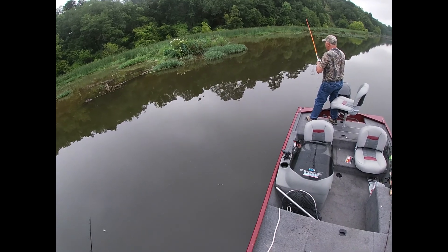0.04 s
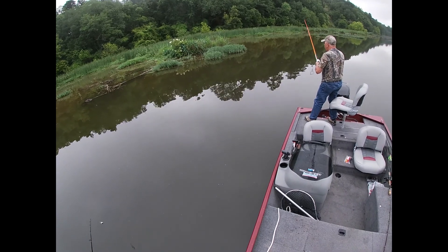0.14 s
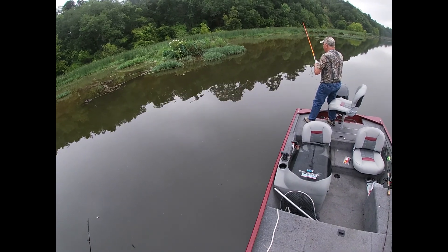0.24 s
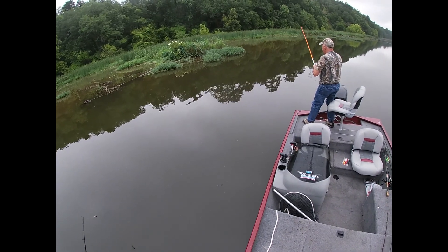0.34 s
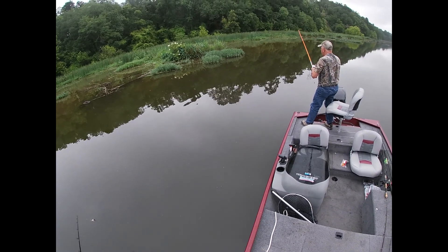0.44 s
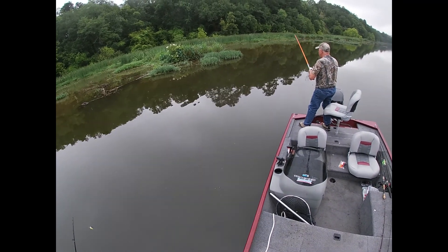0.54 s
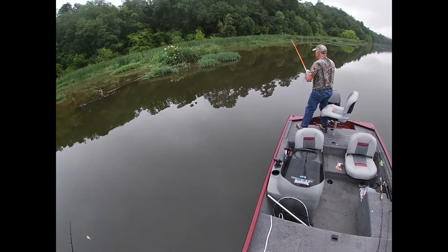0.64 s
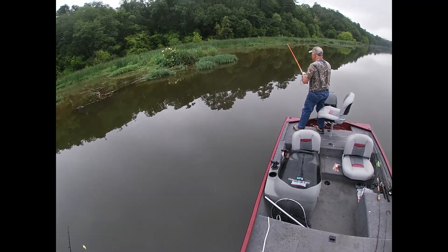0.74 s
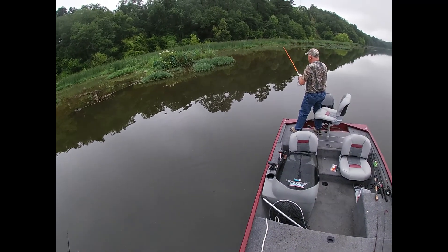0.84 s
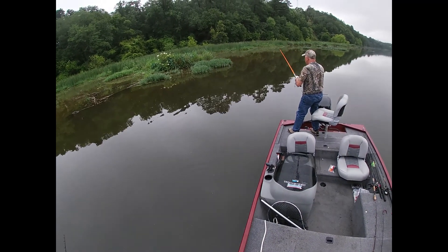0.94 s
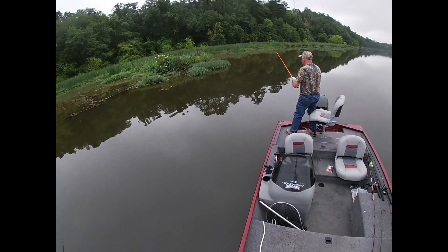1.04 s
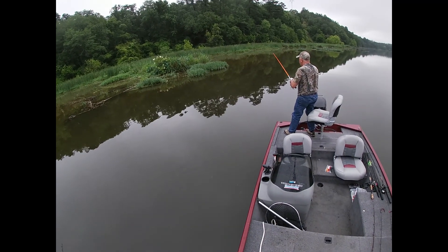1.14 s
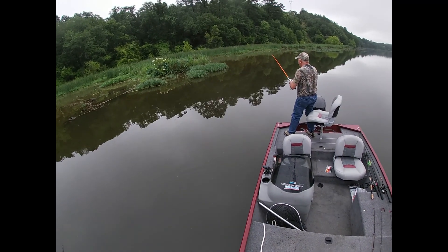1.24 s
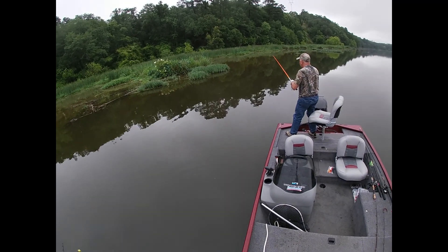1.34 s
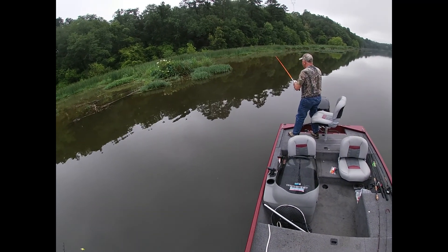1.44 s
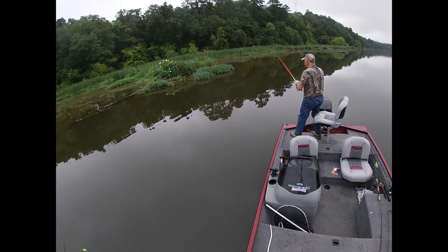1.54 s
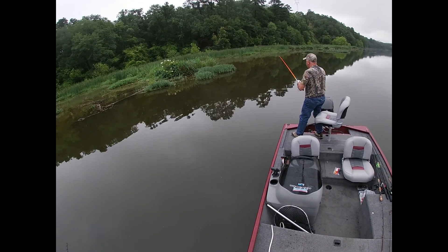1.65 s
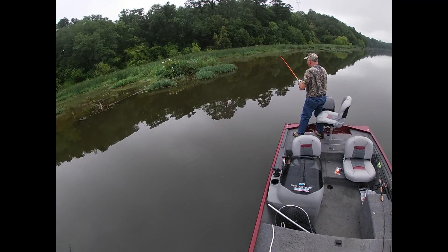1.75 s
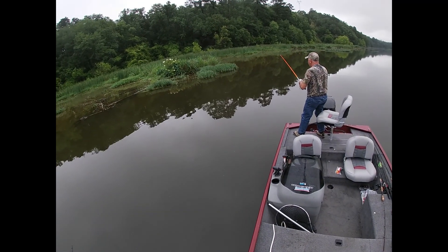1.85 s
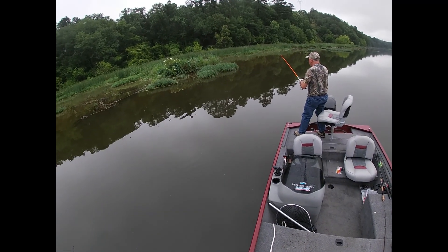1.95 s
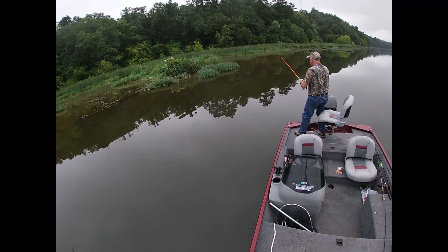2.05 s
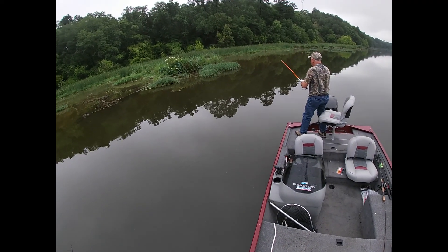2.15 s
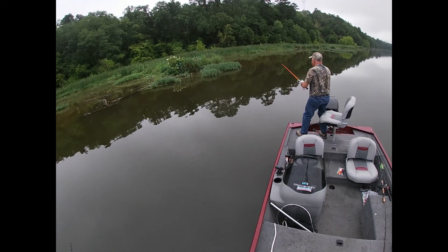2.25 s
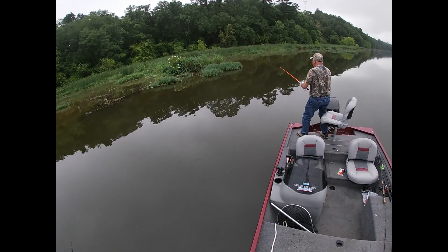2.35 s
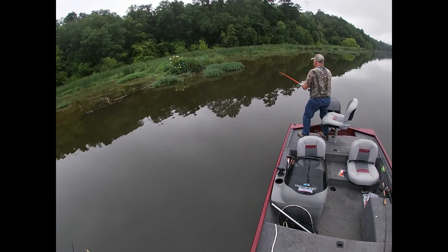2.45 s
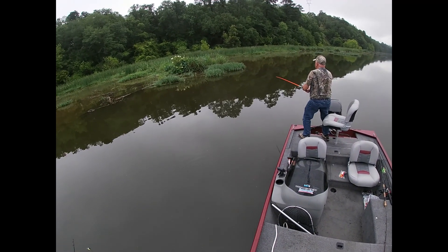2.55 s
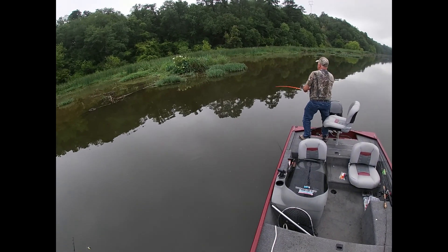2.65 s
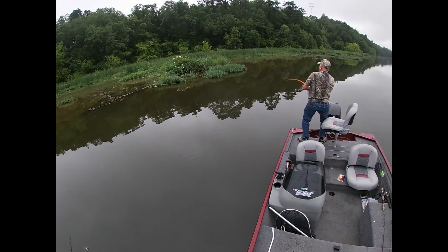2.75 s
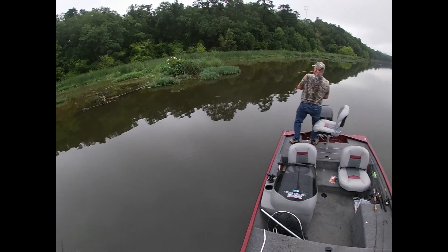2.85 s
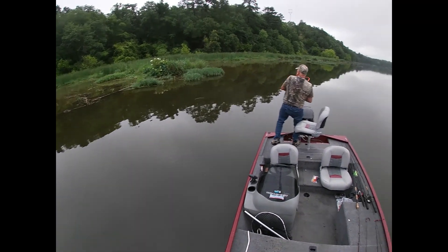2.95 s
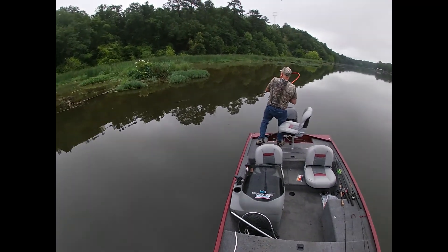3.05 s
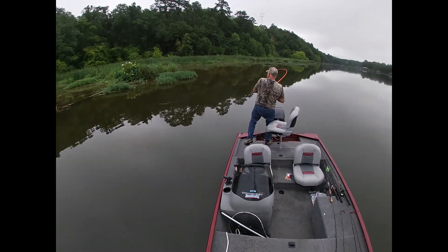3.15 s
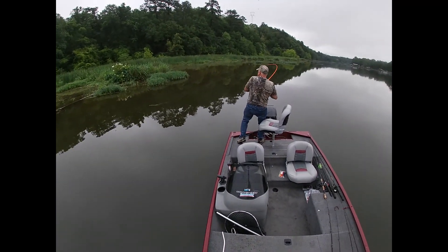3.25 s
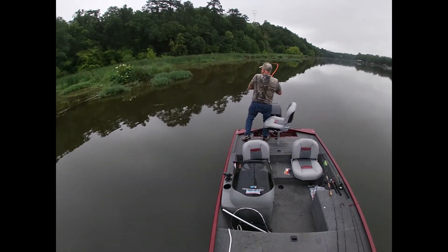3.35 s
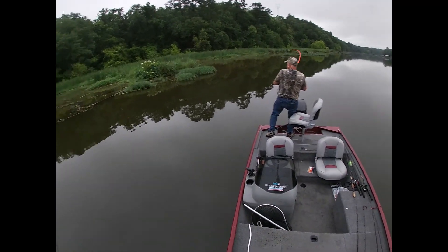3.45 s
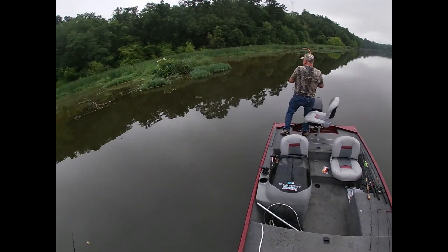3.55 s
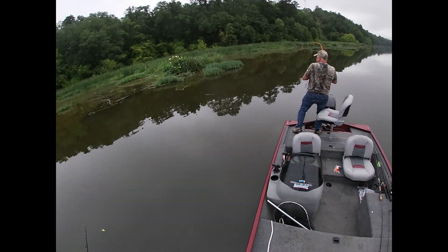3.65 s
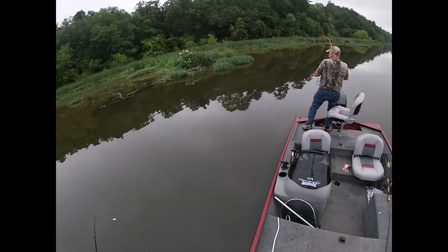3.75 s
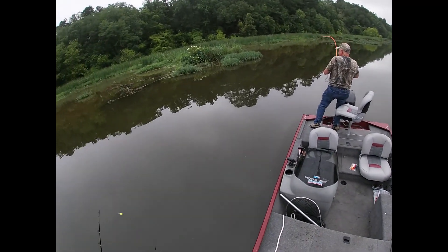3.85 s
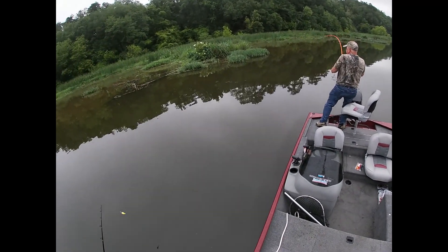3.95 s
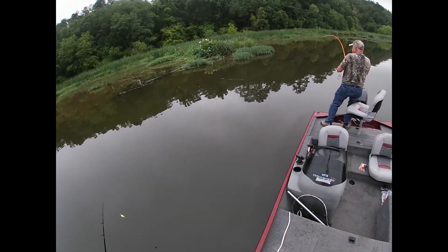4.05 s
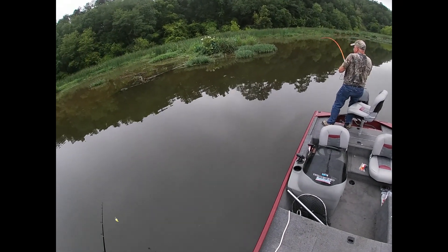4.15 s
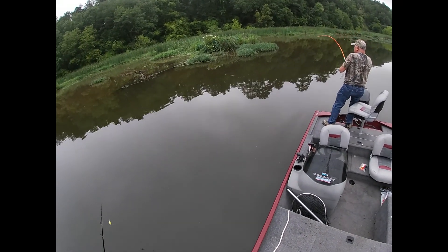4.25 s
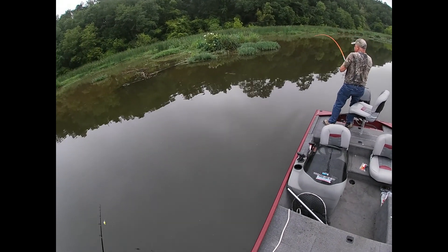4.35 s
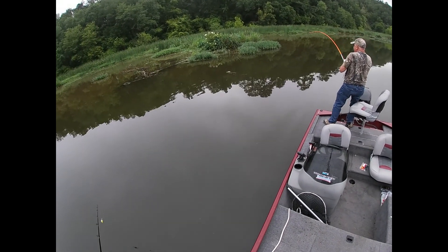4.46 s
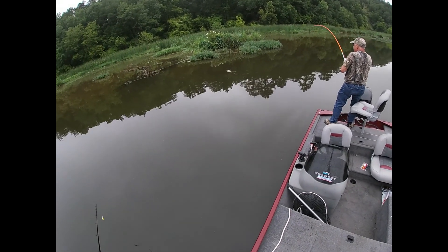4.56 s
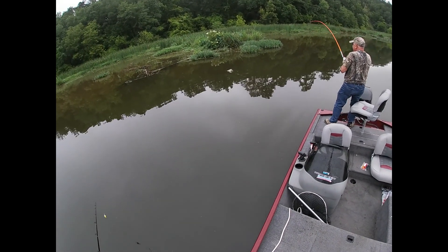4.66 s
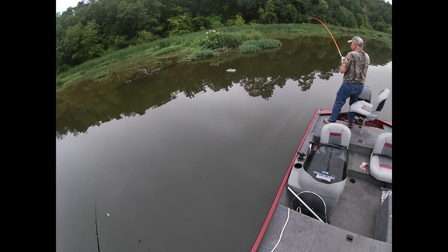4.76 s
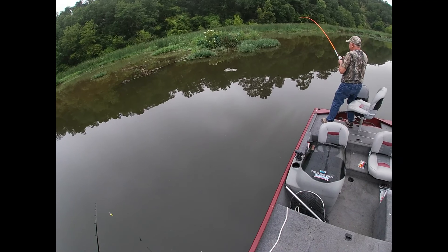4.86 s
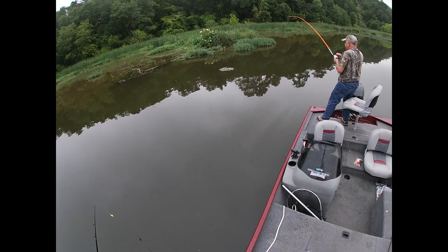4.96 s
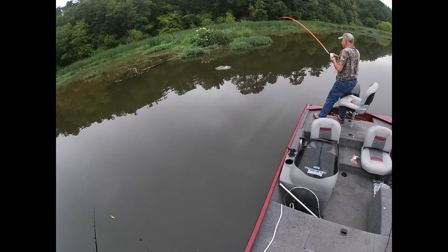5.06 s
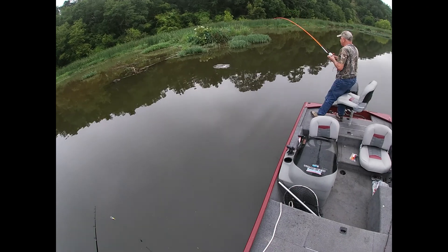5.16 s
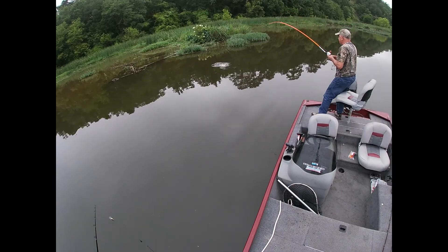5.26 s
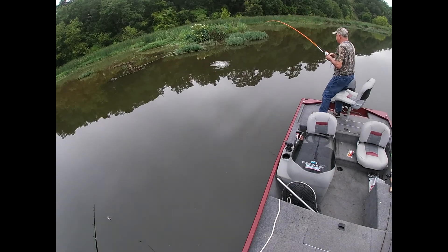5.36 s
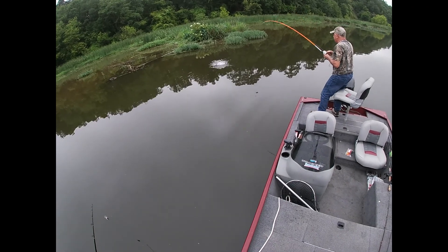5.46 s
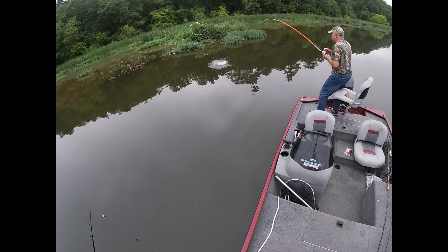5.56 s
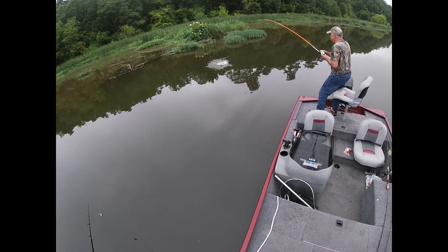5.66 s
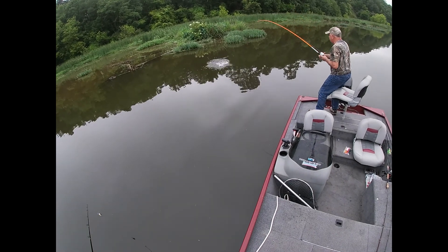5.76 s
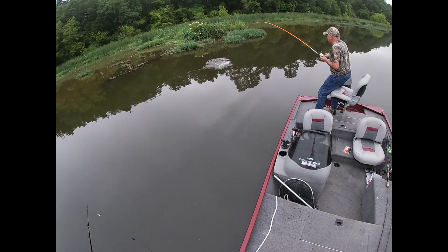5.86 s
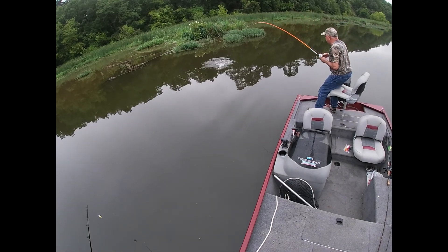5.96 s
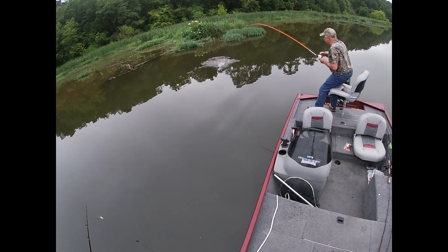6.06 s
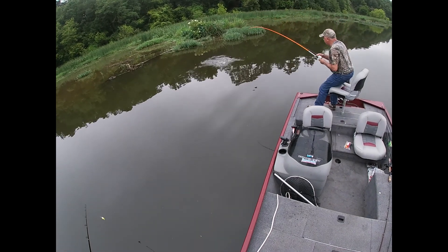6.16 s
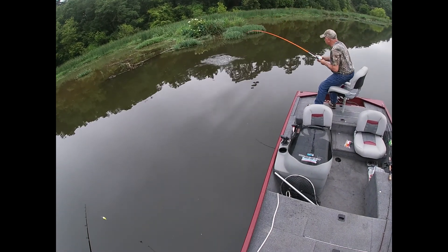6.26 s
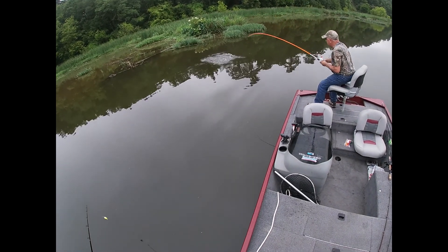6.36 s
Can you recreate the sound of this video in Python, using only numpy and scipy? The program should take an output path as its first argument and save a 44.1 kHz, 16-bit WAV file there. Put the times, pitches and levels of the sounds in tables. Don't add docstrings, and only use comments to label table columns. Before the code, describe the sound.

Steady insect buzz and light birdsong over still water, soft rustling, a double metallic click, then bubbly slaps and spray from a thrashing fish.

```python
import sys
import numpy as np
from scipy import signal
from scipy.fft import rfft, irfft, next_fast_len
from scipy.io import wavfile
from scipy.ndimage import map_coordinates

SR = 44100
rng = np.random.default_rng(int(sys.argv[2]) if len(sys.argv) > 2 else 0)


def invert_db(level):
    return 10 ** (np.asarray(level, dtype=float) / 20)


def master(y):
    cut = np.clip(np.atleast_2d(y).T, -1, 1)
    pcm = np.round(cut * 32767)
    wavfile.write(sys.argv[1], SR, pcm.astype(np.int16))


N = 283122

# start in seconds, peak level in dB, start pitch in Hz, end pitch in Hz, t60 in seconds.
PLUNGES = [(4.878, -49, 408, 537, 0.15), (5.077, -31.5, 517, 287, 0.019), (5.09, -52, 182, 230, 0.09),
           (5.394, -36.5, 785, 457, 0.018), (5.411, -40.5, 292, 340, 0.076),
           (5.465, -34.5, 400, 393, 0.056), (5.511, -29.5, 700, 610, 0.01), (5.516, -34, 280, 354, 0.11),
           (6.029, -32.5, 156, 406, 0.1), (6.101, -34.5, 205, 520, 0.084), (6.235, -39, 400, 570, 0.052),
           (6.333, -48.5, 567, 733, 0.078), (5.799, -56, 200, 210, .12), (4.971, -43.5, 206, 220, 0.055),
           (6.061, -36.5, 189, 200, 0.042), (6.336, -36.5, 203, 218, 0.035)]
# time in seconds, level in dB.
THRASH = [(4.722, -80), (4.737, -58), (4.97, -54.5), (5.06, -58.5), (5.45, -51), (5.63, -49), (5.65, -51),
          (5.85, -46), (5.92, -48), (5.94, -49.5), (6.125, -50.5), (6.17, -56), (6.42, -64)]
# start in seconds, peak level in dB, upper band edge in Hz.
SLAPS = [
    (5.01, -39, 2630),
    (5.079, -28, 1100),
    (5.168, -38, 1700),
    (5.394, -32.5, 2550),
    (5.5126, -29.5, 3400),
    (5.804, -36, 2600),
    (6.06, -34.5, 6960),
    (6.131, -45, 7900),
    (6.3335, -33, 2580),
]


def fish():
    out = pockets() + drops() + slaps() + spray()
    return out + invert_db(-13.5) * echoes(out)


def pockets():
    # start in seconds, peak level in dB, pitch in Hz.
    middling = [(4.75, -48.5, 690), (4.79, -43, 1220), (5.033, -49.5, 840), (5.167, -37.5, 742),
                (5.193, -36, 873), (5.235, -49, 726), (5.605, -42.5, 684), (5.663, -43, 683),
                (5.793, -44.5, 736), (5.942, -38.5, 760), (6.002, -44, 492), (6.078, -36.5, 1150),
                (6.1, -38, 840), (6.158, -48, 793), (6.187, -44, 744)]
    out = np.zeros(N)
    for s, db, hz, end_hz, t60 in PLUNGES:
        add(out, s, invert_db(db) * bubble(hz, end_hz, t60))
    for s, db, hz in middling:
        add(out, s, invert_db(db) * bubble(hz, 1.098 * hz, 21.3 / hz))
    return out


def drops():
    # start in seconds, peak level in dB, pitch in Hz.
    clear = [(4.753, -47, 1760), (4.8394, -36, 1764), (4.873, -42, 1274), (4.973, -39.5, 3160),
             (5.006, -47, 1420), (5.076, -58, 1410), (5.09, -40, 1510), (5.1673, -42, 1454),
             (5.301, -38, 1266), (5.326, -40.5, 2900), (5.3799, -35, 1174), (5.467, -41, 1420),
             (5.5153, -39, 1330), (5.593, -38, 1366), (5.686, -48, 1595), (5.739, -52, 2310),
             (5.806, -37, 2540), (5.8998, -40, 3230), (5.954, -36.5, 1284), (6.011, -36.5, 1344),
             (6.0378, -41, 1210), (6.09, -37, 2320), (6.247, -45, 3240), (6.271, -46, 3260),
             (6.356, -51, 713)]
    # start in seconds, peak level in dB, pitch in Hz.
    ticks = [(4.889, -44, 2930), (4.9545, -43, 3200), (5.0244, -39, 4990), (5.0394, -47, 3360),
             (5.0555, -55, 3220), (5.086, -35, 4710), (5.0997, -40, 2860), (5.1224, -37, 3920),
             (5.1463, -42, 3060), (5.1717, -38, 3770), (5.187, -42, 3040), (5.265, -42, 2340),
             (5.3417, -35, 3800), (5.3738, -45, 2120), (5.4666, -48, 2320), (5.512, -31.5, 3020),
             (5.5264, -39, 2340), (5.545, -44, 2290), (5.612, -35, 3070), (5.6274, -34, 3180),
             (5.6866, -34.5, 2170), (5.7944, -34, 3100), (5.8547, -40, 2380), (5.8794, -39, 3130),
             (5.955, -35.5, 2290), (5.9803, -38, 3010), (6.0473, -39, 2450), (6.0602, -35.5, 2260),
             (6.1324, -34.5, 3180), (6.2229, -44, 1830), (6.2947, -47, 2230), (6.3534, -43, 3250)]
    # start in seconds, peak level in dB, pitch in Hz.
    blobs = [(4.813, -41, 1800), (4.9463, -44, 1620), (5.024, -47, 1420), (5.153, -46, 1540),
             (5.2883, -42, 1290), (5.3701, -40, 1116), (5.499, -35, 1380), (5.5402, -39, 1480),
             (5.5813, -44, 1470), (5.6194, -44, 1080), (5.6946, -37.5, 1570), (5.852, -41, 1550),
             (5.9743, -34, 1270), (6.074, -44, 1200), (6.096, -40, 1600), (6.3331, -42, 1630)]
    # start in seconds, peak level in dB.
    spits = [(4.8869, -53), (4.9293, -54), (4.9647, -55), (5.1229, -61), (5.1388, -57), (5.1912, -64),
             (5.266, -56), (5.2845, -54), (5.3293, -53), (5.3658, -49), (5.4082, -55), (5.4621, -59),
             (5.5065, -55), (5.6437, -54), (5.703, -51), (5.7538, -51), (5.7798, -49), (5.788, -47),
             (5.8332, -57), (5.905, -48), (5.944, -61), (6.1201, -61), (6.1326, -57)]
    out = np.zeros(N)
    for s, db, hz in clear:
        add(out, s, invert_db(db - 2) * bubble(hz, 0.944 * hz, 34 / hz))
        impact = invert_db(db - 23 - 60 * np.arange(400) / SR / 0.0095) * rng.standard_normal(400)
        add(out, s, impact)
    for s, db, hz in [*ticks, *blobs]:
        add(out, s, invert_db(db - 2) * bubble(hz, 1.06 * hz, 17 / hz))
    bursts = surges([(s, 0, db + 4) for s, db in spits], rise_s=.0005, fade_s=.012 / np.log(1000))
    return out + bursts * noise(peak(7840, 6700))


def slaps():
    out = np.zeros(N)
    for s, db, bright_hz in SLAPS:
        burst = invert_db(db - 60 * np.arange(900) / SR / 0.016) * rng.standard_normal(900)
        burst[:4] += invert_db(db + 3)
        band = signal.butter(2, [260, bright_hz], "band", fs=SR)
        add(out, s, signal.lfilter(*band, burst))
    return out


def spray():
    # frequency in Hz, density in dB per Hz.
    spray_colour = [(530, -69), (900, 2), (1570, 10.5), (2020, -17), (3070, 0), (4400, 2), (5720, -45),
                    (9680, -120)]
    # frequency in Hz, density in dB per Hz.
    fizz_colour = [(3000, -0.5), (4500, -8), (6500, -3), (8000, -11), (10000, -6.5), (12500, -6),
                   (16000, -5.5)]
    # start in seconds, level in dB.
    showers = [(4.92, -69), (5.29, -77), (5.38, -77), (5.6, -76), (5.66, -79), (5.78, -73), (5.9, -77),
               (5.51, -74), (5.98, -90), (6.08, -90), (6.13, -98), (6.25, -77)]
    # start in seconds, length in seconds, level in dB.
    churns = [
        (4.87, 0.04, -75),
        (5.37, 0.19, -48.5),
        (6, 0.15, -55.5),
        (6.33, 0.023, -58.5),
    ]

    effort_db, = curves(THRASH)
    by_slaps = surges([(s, 0, db - 15.5) for s, db, _ in SLAPS], rise_s=0.0089, fade_s=0.0086)
    thrown = invert_db(effort_db) + by_slaps
    over_plunges = surges([(s, 0, db - 29) for s, db, *_ in PLUNGES], rise_s=0.0035, fade_s=0.016)
    closing = invert_db(effort_db - 5.5) + surges(churns, rise_s=0.0033, fade_s=0.028) + over_plunges
    fine = invert_db(-80.5 + 0.6 * (effort_db + 54.5)) * (effort_db > -99)
    landing = surges([(s, 0, db) for s, db in showers], rise_s=0.0045, fade_s=0.018)
    clumps_db = 1.8 * np.clip(wobble(55), -3, 1.3)

    wash = noise(lambda f: invert_db(along(spray_colour, f)))
    coarse = .44 * wash + .86 * grains(700, hz=1900, spread=.45, cycles=2.6, scatter_db=5)
    slosh = .62 * noise(peak(520, 800))
    slosh += 0.4 * grains(300, hz=685, spread=.35, cycles=3.04, scatter_db=4.0)
    crackle = 0.58 * rng.standard_normal(N)
    crackle += 0.82 * grains(1700, hz=5170, spread=0.41, cycles=1.53, scatter_db=5.0)
    fizz = 0.91 * unit(filtered(crackle, lambda f: invert_db(along(fizz_colour, f))))

    out = thrown * invert_db(clumps_db - 1.5) * coarse + closing * invert_db(3.8 * wobble(30)) * slosh
    droplets = fine * fizz + invert_db(2) * landing * filtered(fizz, peak(8600, 9000))
    return out + invert_db(22.5 + 1.3 * clumps_db) * droplets


def bubble(hz, end_hz, t60):
    t = np.arange(int(t60 * SR)) / SR
    pitch = hz + (end_hz - hz) * np.minimum(t / (.5 * t60), 1)
    decay = invert_db(-60 * (t / t60) ** 1.95)
    onset = 1 - np.exp(-t * hz / 0.95)
    return np.sin(2 * np.pi * np.cumsum(pitch) / SR) * decay * onset


def grains(per_s, hz, spread, cycles, scatter_db):
    start, count = THRASH[0][0], int(per_s * 2)
    when, pitch = rng.random(count), rng.standard_normal(count)
    size = np.minimum(rng.exponential(size=count), 2.6)
    f = np.clip(hz * np.exp(spread * pitch), 150, 14000)[:, None]
    t = np.arange(640) / SR
    age = t * f / cycles
    envelope = invert_db(scatter_db * size)[:, None] * np.exp(-age) * (1 - np.exp(-8 * age))
    rows = envelope * np.sin(2 * np.pi * f * t * (1 + 0.0796 * age))
    at = ((start + 2 * when) * SR).astype(int)[:, None] + np.arange(len(t))
    out = np.bincount(at.ravel(), rows.ravel(), N)[:N]
    return out / np.std(out[round(start * SR):])


def echoes(x):
    # frequency in Hz, t60 in seconds.
    bank_decay = [(300, 0.65), (3000, 0.79), (9000, 0.24)]
    hz, t, z = signal.stft(rng.standard_normal(SR // 2), SR, nperseg=256)
    fading = z * invert_db(-60 * t / along(bank_decay, hz)[:, None])
    tail = signal.istft(fading, SR, nperseg=256)[1]
    return signal.fftconvolve(x, tail / np.linalg.norm(tail))[:N]


def angler():
    # start in seconds, length in seconds, cloth in dB, line hiss in dB, deck in dB.
    moves = [
        (0.245, 0.036, -76, -99, -86),
        (0.629, 0.23, -71, -91, -61),
        (0.966, 0.24, -70, -84, -66),
        (1.775, 0.053, -75, -93, -65.5),
        (2.306, .12, -81, -92, -81),
        (2.602, 0.2, -77, -90, -62),
        (2.928, 0.13, -69, -99, -62),
        (3.193, 0.29, -70.5, -100, -70.5),
        (3.92, 0.45, -91, -83, -79),
        (4.122, 0.026, -80, -100, -68),
    ]
    # centre in Hz, width in Hz.
    sweep = (150, 2700)
    # start in seconds, length in seconds, level in dB.
    swish = (2.94, 0.079, -60.5)
    levels = []
    for k in range(3):
        levels.append(surges([(s, hold, dbs[k]) for s, hold, *dbs in moves], rise_s=.09, fade_s=.05))
    cloth, line, deck = levels
    grit_db = 1.3 * wobble(60) + 1.3 * wobble(9)
    out = (cloth + invert_db(-100.0)) * invert_db(grit_db) * noise(lambda f: peak(1450, 800)(f) ** 2)
    out += (line + invert_db(-89.0)) * invert_db(6 + grit_db) * noise(lambda f: peak(7500, 3500)(f) ** 2)
    out += (deck + invert_db(-86.5)) * invert_db(-3.0 + 1.8 * wobble(50)) * noise(peak(*sweep))
    out += surges([swish], rise_s=0.062, fade_s=.02) * noise(lambda f: peak(1280, 350)(f) ** 2)
    return out + reel()


def reel():
    # start in seconds, peak level in dB, knock relative to it in dB, t60 in seconds.
    snaps = [
        (2.773, -49.5, 5, .015),
        (2.8003, -27, -14.5, 0.03),
        (2.9999, -49, 5, 0.008),
        (3.0196, -21, -12.5, 0.027),
        (3.061, -43.5, -1.5, 0.013),
    ]
    # start in seconds, peak level in dB, pitch in Hz, t60 in seconds.
    rings = [(2.8008, -38.5, 1820, 0.02), (2.809, -45, 190, 0.063), (2.826, -53, 500, 0.047),
             (3.1, -54, 810, 0.019), (3.0003, -48.5, 410, .04), (3.0196, -37.5, 2220, .02),
             (3.0205, -39, 3640, .03), (3.022, -37, 4440, .025), (3.023, -44, 2990, .04),
             (3.027, -45, 390, 0.1), (3.024, -46, 211, 0.087), (4.19, -56, 400, 0.072),
             (3.0, -42, 2800, 0.0057), (3.075, -53, 155, 0.13)]
    out, cracks, knocks = np.zeros(N), np.zeros(N), np.zeros(N)
    t = np.arange(SR // 8) / SR
    for s, db, knock_db, t60 in snaps:
        rattle = rng.standard_normal((2, len(t)))
        crack = invert_db(db - 60 * (t / t60) ** 1.1) + invert_db(db - 29.0 - 60 * t / 0.53)
        knock = invert_db(db + knock_db - 60 * t / 0.11) * (1 - np.exp(-t / 0.0089))
        add(cracks, s, rattle[0] * crack)
        add(knocks, s, rattle[1] * knock)
        add(knocks, s + 0.00204, invert_db([db + knock_db + 11.5]))
    for s, db, hz, t60 in rings:
        add(out, s, invert_db(db) * bubble(hz, hz, t60))
    bright = filtered(cracks, lambda f: peak(4900, 4200)(f) + 0.5 * peak(1800, 200)(f))
    thud = filtered(knocks, lambda f: peak(420, 350)(f) + 0.9 * peak(195, 60)(f) + 0.1 * peak(1500, 900)(f))
    return out + invert_db(-2.0) * bright + invert_db(14) * thud


def birds():
    chip_levels = [-69, -62, -59, -60, -61.5, -64, -64, -69]
    start_s, every_s, hz = 2.475, .3043, 2035
    chips = whistle([(start_s + k * every_s, .026, .965 * hz, hz, .985 * hz, db)
                     for k, db in enumerate(chip_levels)])
    chatter = []
    for a, b, c, d, e in rng.random((80, 5)):
        pitches = 3500 + 1400 * c, 3150 + 1400 * (c + d) / 2, 2800 + 1400 * d
        chatter.append((1.9 + 3.2 * a, 0.026 + 0.035 * b, *pitches, -78 + 5 * e))
    out = whistle(songs() + chatter) * invert_db(2.6 * wobble(110))
    return out + chips + invert_db(-4.5) * echoes(out + .4 * chips)


def songs():
    # start in seconds, length in seconds, start in Hz, end in Hz, level in dB.
    strays = [(0.036, 0.025, 3200, 2000, -59), (0.06, 0.06, 1940, 2050, -70),
              (0.43, .016, 2540, 2350, -58.5), (.933, 0.019, 1950, 1820, -67),
              (0.958, 0.09, 3340, 3380, -73), (1.05, .028, 3380, 3020, -72), (1.285, .11, 3320, 3330, -75),
              (1.495, .095, 3280, 3345, -66), (2.1, 0.3, 2560, 2380, -73.5),
              (2.922, 0.037, 4400, 4100, -62), (4.792, 0.058, 8050, 7860, -66),
              (4.866, 0.042, 7800, 7450, -64), (.815, .02, 4500, 3740, -70), (0.32, 0.05, 3200, 2800, -63),
              (2.35, 0.029, 3900, 4550, -60), (2.36, .042, 4600, 3150, -59),
              (2.127, 0.054, 5000, 3800, -66), (2.235, .04, 4400, 4900, -59), (2.2, .024, 3900, 4950, -59),
              (2.57, 0.031, 3650, 4800, -62), (2.762, 0.032, 3900, 3200, -67),
              (3.375, .03, 3900, 3760, -68), (3.618, 0.031, 3590, 3450, -70),
              (4.28, 0.026, 3300, 4420, -56), (1.545, 0.025, 2800, 3280, -67),
              (4.745, .035, 6450, 6800, -67), (2.69, .11, 7000, 8800, -76), (.788, 0.019, 3080, 3300, -71),
              (3.1, 0.047, 4300, 4700, -66), (3.135, 0.027, 4200, 4900, -71), (2.4, .04, 3300, 4800, -59)]
    notes = warbler() + whistler() + sagging() + peeps()
    return notes + [(s, length, a, (a + b) / 2, b, db) for s, length, a, b, db in strays]


def warbler():
    # start in seconds, start pitch in Hz, end pitch in Hz, level in dB.
    slurs = [(0, 3740, 3240, -74), (3.29, 4700, 4200, -68), (2.085, 4220, 3090, -64.5),
             (2.34, 4060, 3600, -62.5), (2.606, 3450, 2910, -62), (2.635, 3430, 2920, -56),
             (2.635, 4500, 3800, -66), (2.712, 4800, 3950, -60), (2.931, 3410, 2850, -55.5),
             (3.21, 4300, 2760, -62), (3.275, 3700, 3200, -70), (3.505, 4450, 2800, -61.5),
             (3.733, 4400, 3400, -67), (3.821, 4120, 2750, -61.5), (3.905, 4480, 3620, -66),
             (4.129, 4040, 3130, -61), (4.15, 3156, 2740, -61), (4.338, 4280, 3130, -57),
             (4.436, 4180, 2740, -64.5), (1.985, 4000, 4800, -65), (1.925, 4130, 4600, -68),
             (2.845, 3760, 4240, -65), (3.361, 3260, 3716, -66), (3.595, 3060, 3580, -68),
             (3.71, 3960, 4570, -62), (3.87, 3700, 4500, -61)]
    hz_per_s, settle_s, rise_faster = 33000, .015, 1.7
    halfway = .66
    notes = []
    for s, a, b, db in slurs:
        span_hz = max(a - b, (b - a) / rise_faster)
        notes.append((s, settle_s + span_hz / hz_per_s, a, a + halfway * (b - a), b, db))
    return notes


def whistler():
    # start in seconds, high note in dB, low note in dB.
    calls = [
        (.25, -72, -88),
        (.625, -66, -67),
        (.993, -64, -64),
        (1.382, -68.5, -88),
    ]
    low_after_s, flick_hz, flick_s = .155, 450, .026
    notes = []
    for s, high_db, low_db in calls:
        for at, length, hz, db in [(s, .05, 3790, high_db), (s + low_after_s, .125, 3330, low_db)]:
            notes.append((at - .015, .02, hz - flick_hz / 2, hz - flick_hz / 4, hz, db - 3))
            notes.append((at, length, .995 * hz, hz, .997 * hz, db))
            notes.append((at + length - .012, flick_s, hz, hz - flick_hz / 2, hz - flick_hz, db - 2))
    return notes


def sagging():
    # start in seconds, level in dB.
    slides = [
        (0.161, -75),
        (1.0, -66.5),
        (1.915, -67),
    ]
    top_hz, sag_hz, half_s, tail_db = 2810, 165, .125, -3.5
    notes = []
    for s, db in slides:
        for k in range(2):
            hz = top_hz - k * sag_hz
            middle_hz = hz - sag_hz * (.3 + .2 * k)
            notes.append((s + .9 * k * half_s, half_s, hz, middle_hz, hz - sag_hz, db + k * tail_db))
    return notes


def peeps():
    # start in seconds, pitch in Hz, level in dB.
    calls = [(.136, 7230, -69), (3.972, 7580, -68), (4.04, 7050, -68), (4.05, 7680, -68), (4.14, 8430, -72),
             (4.13, 6880, -73), (4.17, 7100, -75), (4.335, 6680, -64.5), (4.375, 6620, -67),
             (4.77, 6800, -63), (4.805, 6720, -64), (4.37, 8430, -74)]
    return [(s, .055, hz, hz, (1 - .012) * hz, db) for s, hz, db in calls]


def whistle(notes):
    out = np.zeros(N)
    for s, length, *hz, db in notes:
        u = np.linspace(0, 1, int(length * SR))
        pitch = np.polyval(np.polyfit([0, .5, 1], hz, 2), u)
        swell = np.sin(np.pi * u ** 1.3) ** .4
        add(out, s, invert_db(db - .7) * swell * np.sin(2 * np.pi * np.cumsum(pitch) / SR))
    return out


def bank():
    # time in seconds, low insects in dB, high insects in dB.
    chorus = [
        (0.0, -56.5, -61.5),
        (0.91, -55, -60.5),
        (5.9, -55.5, -58.5),
        (6.42, -55.5, -61.5),
    ]
    # frequency in Hz, density in dB per Hz.
    air = [(150, -18), (250, -9), (500, -20), (780, 2.5), (1050, -6.5), (1700, -5), (2600, 0.5), (4300, -3),
           (6600, -1), (7300, -15.5), (10000, -9.5), (12500, -3), (16000, -27)]
    low_db, high_db = curves(chorus)
    hush = invert_db(-64.0 + 0.4 * wobble(5.7)) * noise(lambda f: invert_db(along(air, f)))
    frogs = invert_db(-78 + 4.2 * wobble(21.3) + 0.21 * wobble(4.3)) * noise(lambda f: peak(2300, 300)(f) ** 2)
    low = insects(low_db + 0.25, hz=5288, width_hz=345, rate=70, depth_db=2.6)
    high = insects(high_db + 0.27, hz=5960, width_hz=395, rate=64, depth_db=1.0)
    return low + high + hush + frogs


def insects(db, hz, width_hz, rate, depth_db):
    phase = 2 * np.pi * np.cumsum(rate * (1 + 0.0515 * wobble(4.3))) / SR
    pulse_db = depth_db * (-0.5 + 0.26 * wobble(2)) * np.sin(phase)
    pulses = invert_db(pulse_db + 0.68 * wobble(25) + 0.074 * wobble(8.9))
    rasp = filtered(pulses * rng.standard_normal(N), lambda f: invert_db(-6 * abs((f - hz) / width_hz) ** 2.1))
    return invert_db(db) * unit(rasp)


def hull():
    # time in seconds, level in dB.
    rock = [(0.0, -94), (0.2, -74), (1.12, -75.5), (1.18, -80.5), (3.18, -68), (3.24, -88), (3.42, -63),
            (3.57, -73.5), (3.75, -58.5), (3.86, -88), (4.06, -62), (4.5, -83), (4.97, -61), (5.17, -89),
            (5.26, -74), (6.2, -71), (6.22, -62), (6.42, -82)]
    # frequency in Hz, width in Hz, level in dB.
    modes = [
        (73.7, 6.3, 0),
        (158.7, 10, 3.5),
        (192.6, 38, 1),
    ]
    # start in seconds, level in dB.
    gusts = [
        (0, -62),
        (.87, -61),
        (2.029, -66),
        (2.96, -57),
        (3.42, -49),
        (3.6, -73),
        (4, -63),
        (6.19, -54),
    ]
    boom_db, = curves(rock)
    (boom_hz, boom_width_hz, _), *hums = modes
    swaying_hz = 1.1 * boom_hz * (1 + .04 * wobble(7.6))
    boom = np.sin(2 * np.pi * np.cumsum(swaying_hz) / SR) + 0.79 * noise(peak(boom_hz, boom_width_hz))
    out = invert_db(boom_db - 1.0 + 2.3 * wobble(7.5)) * boom
    hum = noise(lambda f: sum(invert_db(db) * peak(hz, w)(f) for hz, w, db in hums))
    waves = invert_db(-66.5) + surges([(s, 0, db - 30) for s, db, *_ in PLUNGES], rise_s=0.0097, fade_s=0.047)
    out += waves * invert_db(2.46 * wobble(12)) * hum
    wind = invert_db(-75.5) + surges([(s, 0, db) for s, db in gusts], rise_s=0.033, fade_s=0.048)
    return out + wind * invert_db(-4.0 + 1.7 * wobble(8.7)) * noise(lambda f: peak(38, 45)(f) ** 2)


def unit(x):
    return x / np.sqrt(np.mean(x ** 2) + 1e-20)


def along(points, hz):
    f, v = np.transpose(points)
    return np.interp(np.log(hz + 1), np.log(f + 1), v)


def curves(rows):
    s, *columns = np.transpose(rows)
    t = np.arange(N) / SR
    return [np.interp(t, s, c, -200, c[-1] if s[-1] > 6 else -200) for c in columns]


def wobble(rate):
    return map_coordinates(rng.standard_normal(int(N * rate / SR) + 4), [np.arange(N) * rate / SR])


def filtered(x, response):
    m = next_fast_len(N + SR // 2)
    return irfft(rfft(x, m) * response(np.fft.rfftfreq(m, 1 / SR)), m)[:N]


def peak(hz, width_hz):
    return lambda f: 1j * f * width_hz / (hz * hz - f * f + 1j * f * width_hz)


def noise(response):
    return unit(filtered(rng.standard_normal(N), response))


def add(into, s, sound):
    part = into[round(s * SR):][:len(sound)]
    part += sound[:len(part)]


def surges(rows, rise_s, fade_s):
    out = np.zeros(N)
    for s, hold, db in rows:
        t = np.arange(int((rise_s + hold + 6 * fade_s) * SR)) / SR
        fade = np.exp(-np.maximum(t - rise_s - hold, 0) / fade_s)
        add(out, s, invert_db(db) * np.minimum(t / rise_s, 1) * fade)
    return out


def scene():
    direct = fish() + angler() + bank()
    deck = lambda f: 1 + .33 / (1 + (f / 4000) ** 2) * np.exp(-2j * np.pi * f * .00131)
    return (invert_db(-0.92) * filtered(direct, deck) + birds() + hull())[None]


def top_cut(x):
    return signal.sosfilt(signal.butter(12, 15500, fs=SR, output="sos"), x)


def record(dry):
    gaps = [.75, 1.69, 3.5, 4.08, 4.163]
    t = np.arange(N) / SR
    dips = sum(np.exp(-((t - s) / .006) ** 2) for s in gaps)
    dull = signal.sosfilt(signal.butter(4, 6900, fs=SR, output="sos"), dry)
    mix = invert_db(-5.5 * dips) * dull + invert_db(-106) * rng.standard_normal(dry.shape)
    return top_cut(mix)


dry = scene()
out = record(dry)
master(out)
```